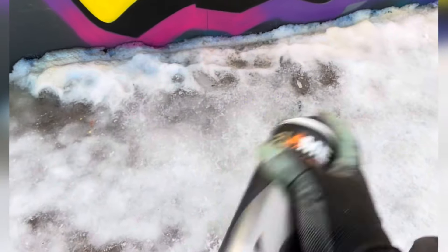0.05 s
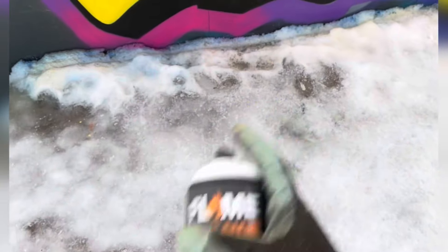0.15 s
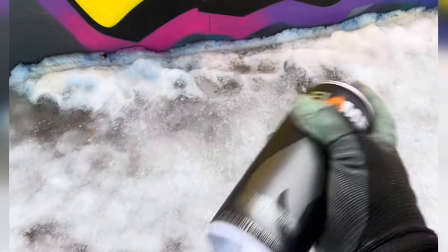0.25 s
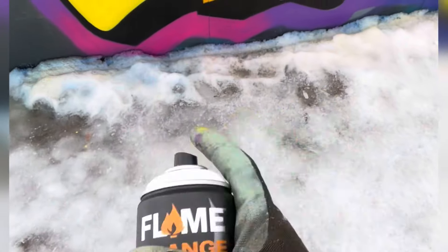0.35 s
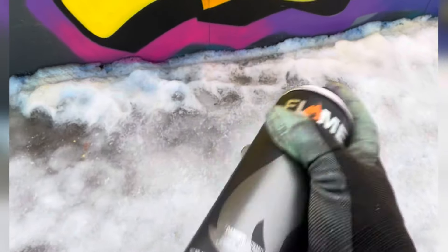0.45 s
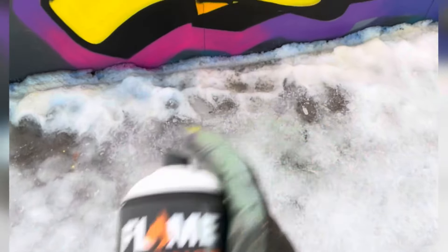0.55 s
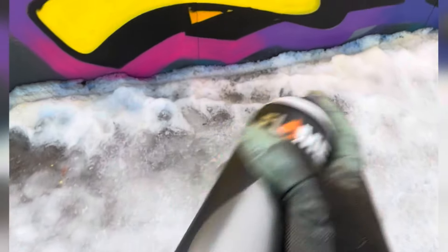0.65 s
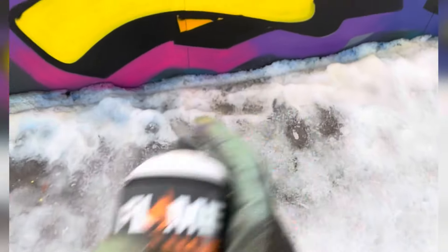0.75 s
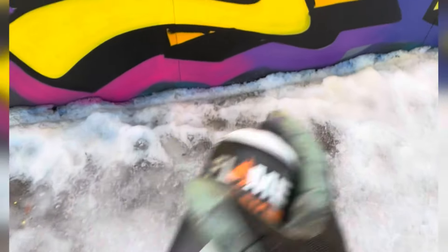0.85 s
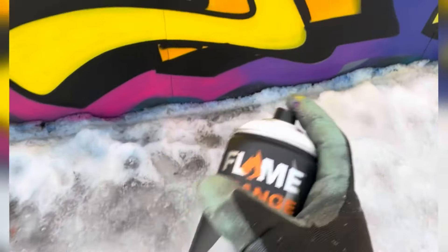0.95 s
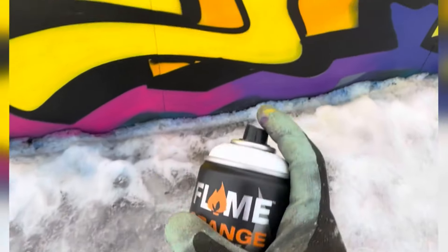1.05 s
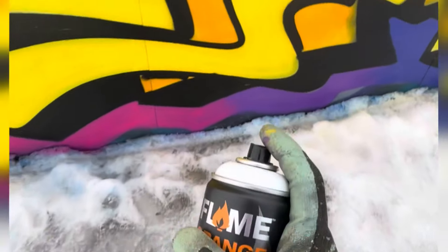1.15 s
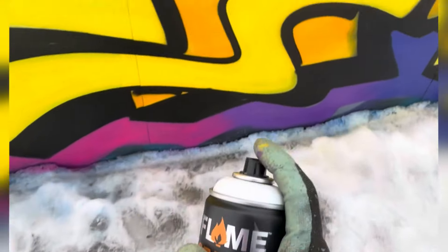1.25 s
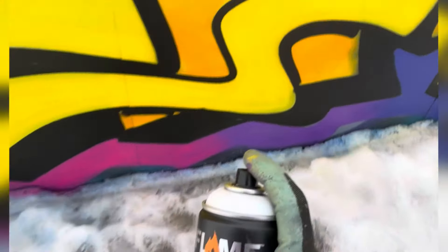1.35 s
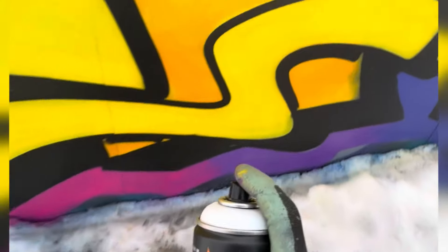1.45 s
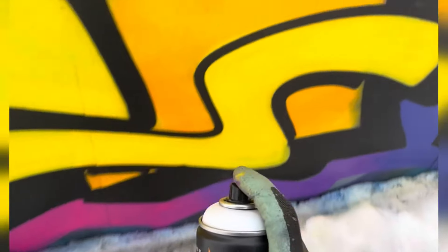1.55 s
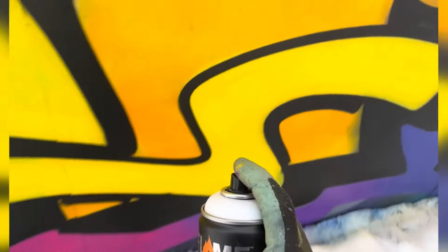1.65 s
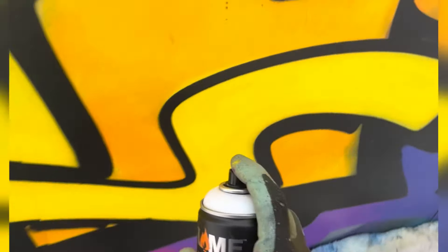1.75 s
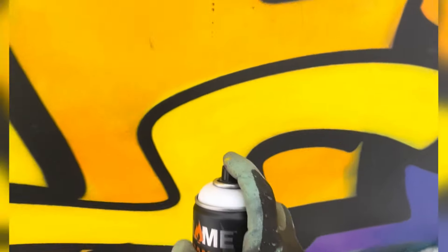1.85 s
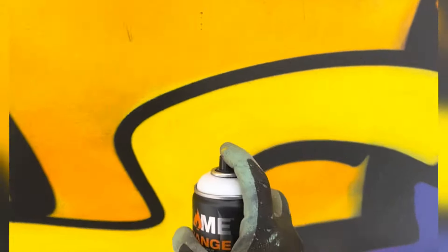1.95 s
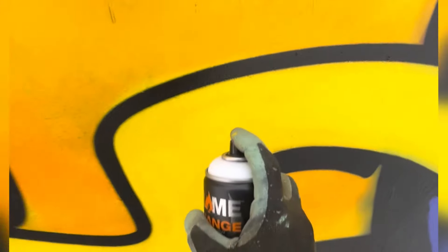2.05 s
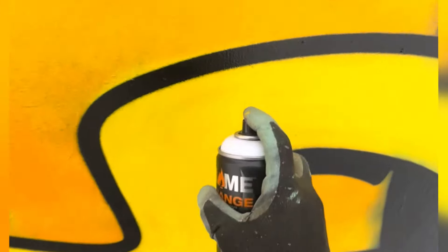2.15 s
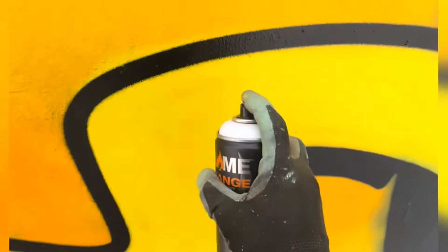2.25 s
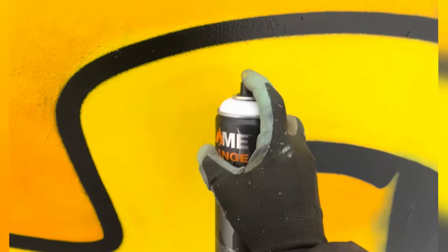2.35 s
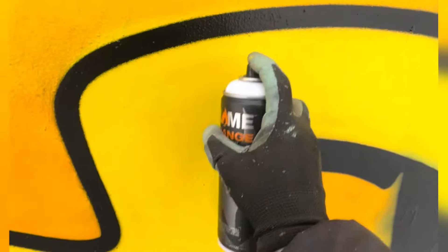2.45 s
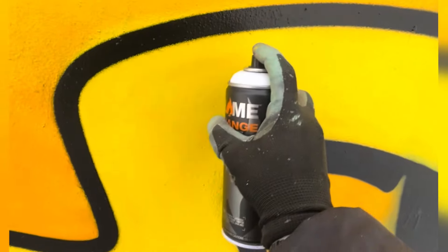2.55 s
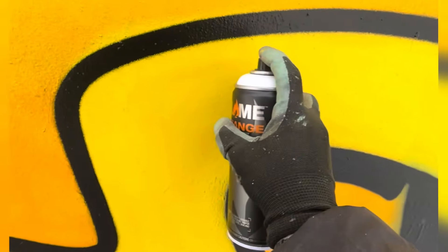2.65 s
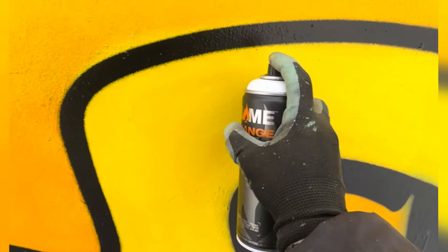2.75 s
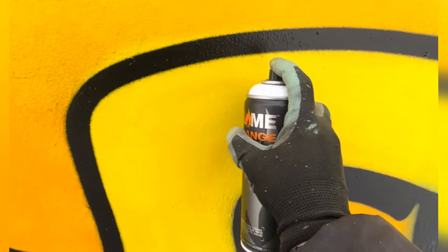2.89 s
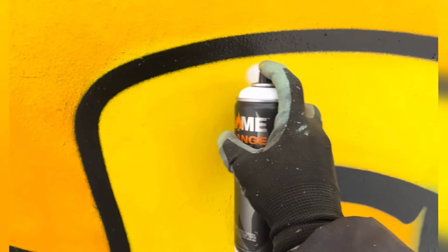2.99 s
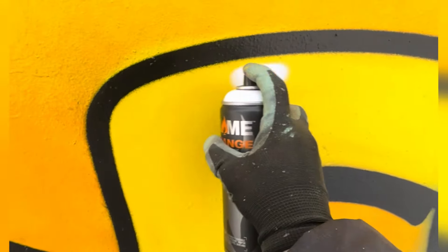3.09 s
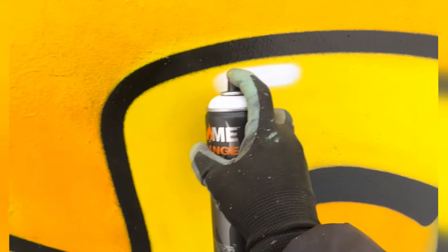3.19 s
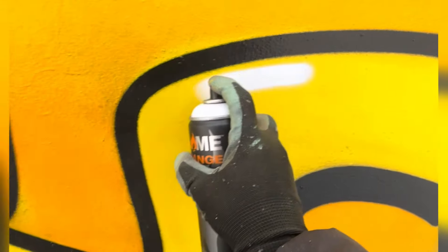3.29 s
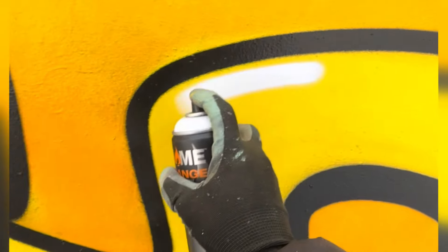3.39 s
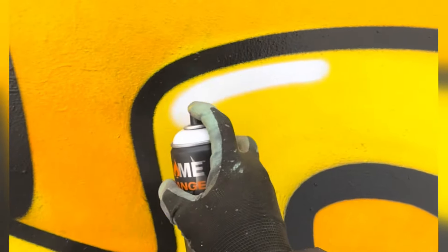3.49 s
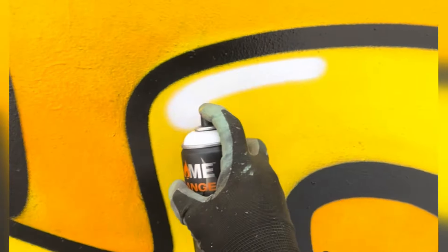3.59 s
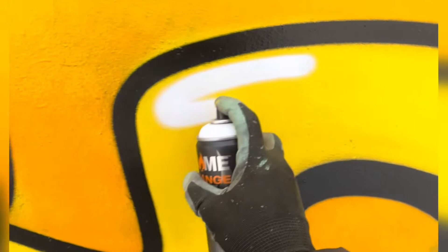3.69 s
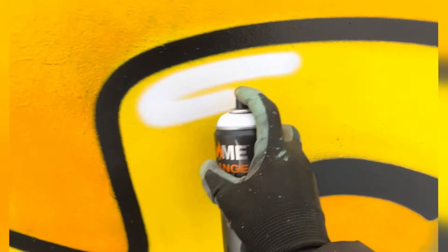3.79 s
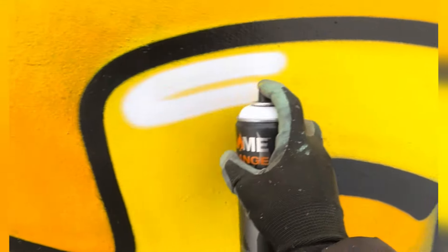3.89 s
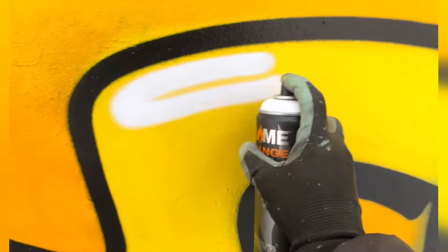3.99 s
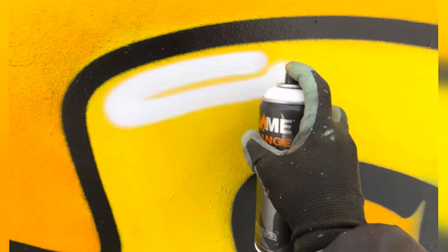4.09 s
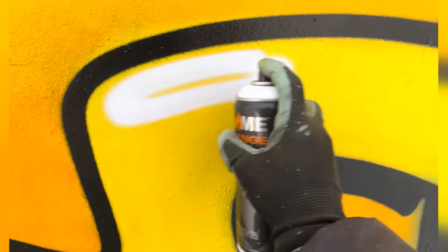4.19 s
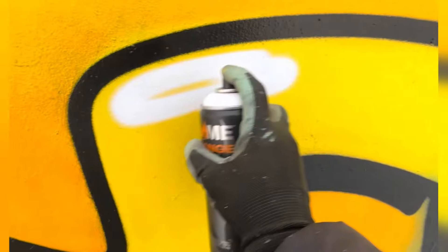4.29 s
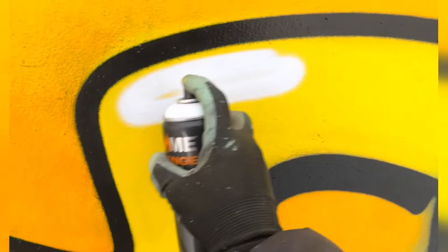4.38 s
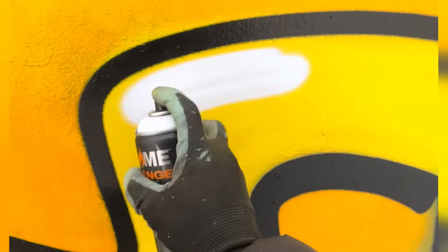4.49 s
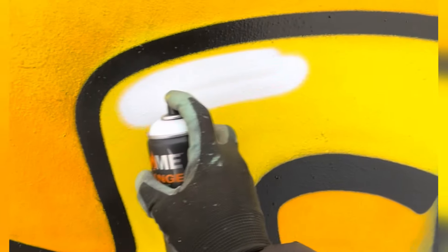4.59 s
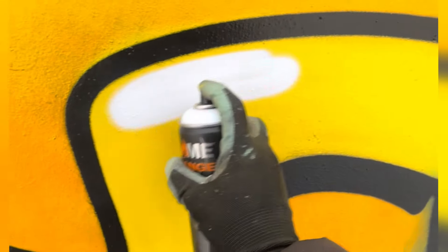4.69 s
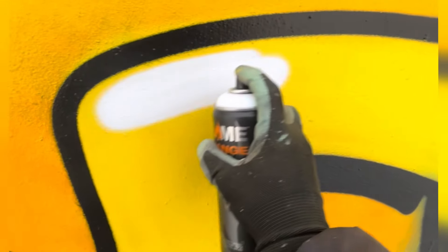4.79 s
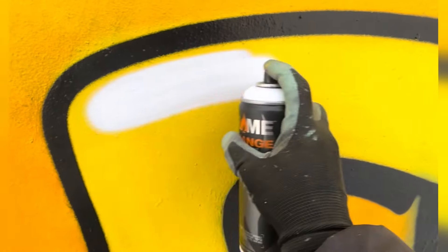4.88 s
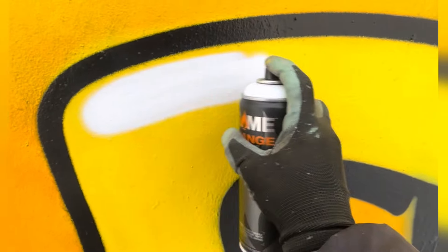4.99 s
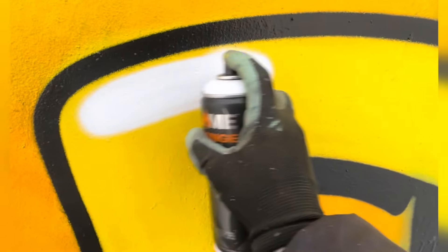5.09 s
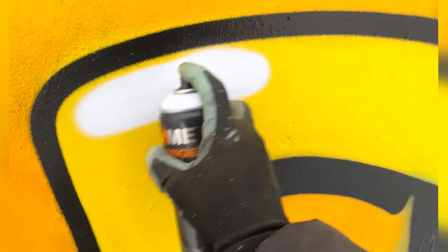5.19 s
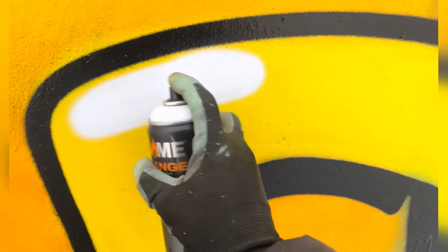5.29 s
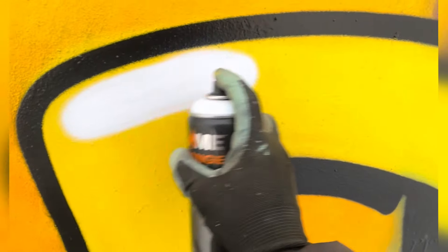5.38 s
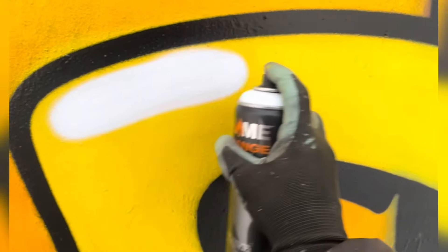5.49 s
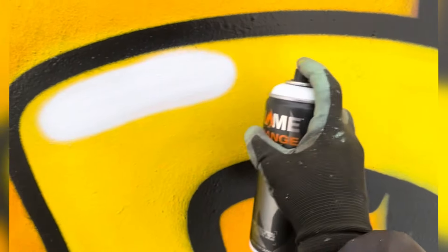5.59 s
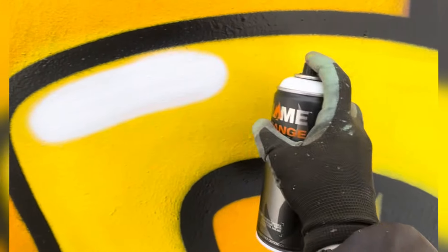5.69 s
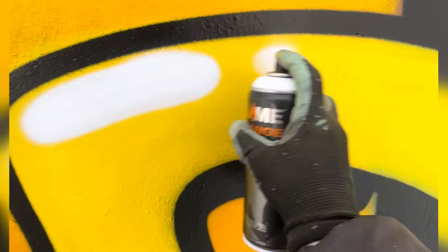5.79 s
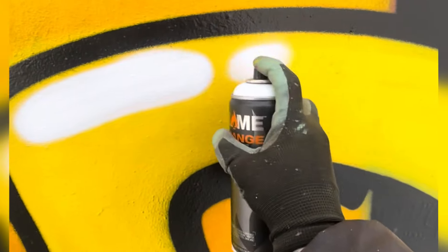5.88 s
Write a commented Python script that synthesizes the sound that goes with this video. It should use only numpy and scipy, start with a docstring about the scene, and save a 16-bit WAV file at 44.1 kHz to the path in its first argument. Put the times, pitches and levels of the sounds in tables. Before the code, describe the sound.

Outdoors beside a wall, recorded close in stereo. From 0 to about 0.95 s a steel paint can is shaken vigorously: its ball clacks in a dense uneven rattle, short damped thuds around 1.5 to 3 kHz with bright ticks, loudest between 0.2 and 0.9 s. A few weaker knocks straggle until 1.33 s. Wind thumps low, strongest near 0.1 s. From 1.25 to 2.6 s boots crunch in crusty snow, the glove scuffs the can, a sleeve slides softly around 1.55 s, and a distinct hollow pop lands at 1.87 s, followed by smaller ones. It nearly quiets, then at 2.9 s a smooth spray hiss opens quickly, its tone shifting from mid-treble to thinner and higher as the can turns, ending at 5.2 s. A second stroke starts at 5.69 s and continues almost to the end. Distant traffic murmurs throughout; a deep vehicle rumble grows after 3.7 s, with a faint intermittent whine near 1.4 kHz.

```python
"""A steel paint can is shaken outdoors by a gloved hand: its mixing ball rings the paint-damped wall.
Boots break crusty snow in uneven grains of noise, air pockets pop, and a sleeve slides with a smooth hiss.
The can sprays one long stroke and starts another: noise through resonances that shift as the can turns.
Wind buffets a two-port microphone in noise bands, over distant traffic and a faint wavering sine whine."""
import sys
import numpy as np
from scipy import signal
from scipy.fft import rfft, irfft
from scipy.io import wavfile
from scipy.ndimage import uniform_filter1d

SR = 44100
rng = np.random.default_rng(int(sys.argv[2]) if len(sys.argv) > 2 else 0)


def put_to_file(sound):
    """Save the sound as 16-bit audio at rate SR, in the file named by the first command-line argument."""
    columns = np.atleast_2d(sound).T  # one column per channel
    safe = np.clip(columns, -1, 1)
    whole_steps = np.round(safe * 32767)
    wavfile.write(sys.argv[1], SR, whole_steps.astype(np.int16))


def to_linear_factor(level_db):
    """Convert decibel levels (scalar or array-like) to linear amplitude factors."""
    exponent = np.asarray(level_db, float) / 20
    return 10 ** exponent


N = 261954
T = np.arange(N) / SR  # s
HZ = np.maximum(np.arange(N // 2 + 1) * SR / N, 1)
KNOCK_LEN, TAIL_LEN, GRAIN_LEN = 1024, 4096, 24  # samples

# ball against the can: t/s, thud level/dB, tick level/dB, thud f/Hz
KNOCKS = [(0.036, -14, -14.5, 3050), (0.06, -18.5, -53, 1660), (0.077, -24.5, -28, 1570),
          (0.1148, -13.5, -4, 3050), (0.1389, -17, -25.5, 2360), (0.1604, -14.5, -29, 1700),
          (.184, -35.5, -52, 1490), (0.2026, -4.5, -10.5, 2890), (0.2796, -15, -14, 1900),
          (0.302, -2.5, -1, 2560), (0.3634, -7, -14, 2200), (0.3986, -1.5, -1.5, 3390),
          (0.409, -4.5, -32, 2120), (0.447, -9.5, -9.5, 2740), (0.4567, -13, -16, 1600),
          (0.501, -15.5, -21, 1880), (0.509, -10, 6.5, 2960), (0.519, -9, -35, 2180),
          (0.547, -12.5, 1, 3040), (0.579, -13, -27, 1730), (0.6285, 1.5, 3, 2440), (0.6533, -8, 0, 2150),
          (0.6679, -13, -32.5, 1550), (0.6956, -15, -23, 1330), (0.721, -13, -21.5, 1860),
          (0.7302, -39.5, 3, 3100), (0.7379, -16, 6.5, 3040), (0.754, -14, -48.5, 2450),
          (0.795, -18, -17, 1620), (0.8307, -18, -41, 2230), (0.853, -4.5, -14.5, 3220),
          (0.865, -7, -28.5, 2170), (0.878, -16.5, -24, 1420), (0.907, -18.5, -43, 1550),
          (0.935, -8, -51, 1780), (.956, -25, -50, 1570), (0.9813, -22, -47, 1600), (1.038, -30, -50, 1900),
          (1.0732, -12, -14.5, 3040), (1.134, -18, -19.5, 1490), (1.187, -29, -32.5, 2370),
          (1.254, -19.5, -38, 2150), (1.2925, -20, -10.5, 2130), (1.33, -25, -16, 2520)]
# modes of the can wall: f/Hz, relative level/dB, t60/s
CAN_MODES = [(1340, 6.5, 0.007), (2450, -9.5, 0.013), (4334, 12, 0.0013), (5480, -7.5, 0.0034),
             (6410, 0.5, 0.0031), (8850, 1.5, 0.0018)]
# processing halo, a narrow 5 kHz ring before and after some knocks: t/s, relative level/dB
HALOS = [(.2, -18.5), (.295, -11.5), (.391, -4), (.505, -14.5), (.621, -5.5), (.725, -8.5), (.788, -26),
         (.846, -19.5), (1.066, -23)]
DOME_HZ = 2576

# boots in the crust and glove on the can: start t/s, length/s, level/dB
CRUNCHES = [(.545, 0.06, -44.5), (1.252, 0.087, -39.5), (1.36, .003, -43), (1.835, 0.15, -44.5),
            (2.078, 0.0035, -50), (2.175, 0.065, -54.5), (2.32, 0.01, -59), (2.47, 0.078, -53),
            (2.777, 0.00095, -59)]
CRUNCH_ATTACK_S, CRUNCH_RELEASE_S = 0.0044, 0.011
# spectrum of the crunch: f/Hz, level per Hz/dB
CRUNCH_SPECTRUM = [(500, 5.5), (1000, 0), (2500, 0), (4500, -4), (7000, -9), (10000, -19.5), (12000, -54)]
# faint rustle running under the steps: t/s, level/dB
FIDGET = [(0, -48.5), (1.2, -56), (2.05, -48.5), (2.55, -59), (2.67, -63.5), (2.72, -70.5), (2.8, -83)]
STIR_DB, STIR_DECAY_S = -40, 0.012  # rustle after each knock, level against its thud
# glove scuffs on the can, rough and hollow: start t/s, length/s, level/dB, f/Hz
SCUFFS = [(0.035, 0.0082, -31, 1060), (0.555, 0.041, -28, 1040), (1.309, 0.023, -32.5, 1030),
          (1.422, 0.029, -42, 1930), (1.456, .37, -54.5, 2570), (1.863, 0.0088, -31, 2700),
          (1.889, 0.009, -30.5, 2500), (1.914, 0.041, -35.5, 2560), (2.198, 0.071, -45.5, 1020),
          (2.488, 0.035, -45, 1108), (2.512, 0.011, -39, 3620)]
# dull hollow pops and bumps under boot and glove: t/s, peak level/dB, f/Hz
POPS = [(1.263, -32, 320), (1.32, -25.5, 775), (1.8686, -11, 683), (1.999, -28.5, 780), (2.06, -33.5, 910),
        (2.176, -36, 990), (2.258, -32.5, 990), (2.336, -36.5, 1100), (2.607, -30, 254)]
# smooth slide of the sleeve: t/s, level/dB
SLEEVE = [(1.2, -79), (1.4, -61.5), (1.55, -51), (1.75, -63.5), (2.3, -64.5)]
# spectrum of the cloth: f/Hz, level per Hz/dB
CLOTH_SPECTRUM = [(800, -11), (6500, -27.5), (8400, 6), (9500, -4), (11000, -53.5)]

# valve held open: start t/s, length/s, level/dB
STROKES = [(2.897, 2.3, -45.5), (5.688, .3, -46.5)]
VALVE_OPEN_S, VALVE_SHUT_S = 0.023, 0.02
# spectrum of the bare jet: f/Hz, level per Hz/dB
JET_SPECTRUM = [(1500, -9.5), (3400, -11.5), (4200, -19), (7000, -10.5), (9000, 1.5)]
# nozzle resonances: f/Hz, width/Hz, level before the turn/dB
NOZZLE = [(2440, 200, -15), (5670, 970, -5.5), (6800, 1400, -4.5), (9530, 2060, -4.5), (4700, 1300, -13.5)]
# strength of the 6.8 kHz resonance as the can turns: t/s, level/dB
TURN = [(2.9, 5), (3.42, -6.5), (3.55, 3), (3.95, 1.5), (4.25, -7.5), (4.55, -12), (5.05, -11.5),
        (5.7, -17), (5.94, -12)]
TOP_DB, TOP_PER_TURN = -3, -0.78  # outer resonances gain what it loses: dB, dB per dB
# dips in the spray's hiss and its steep treble fall-off: f/Hz, level/dB
HISS_DIPS = [(4100, -2.5), (4450, -2), (4850, -4.5), (5150, 0.5), (7150, -1), (7400, -12), (7650, 0.5),
             (8700, -6), (9200, -15), (10000, -27)]
# patchy treble bands heard while the spray sounds: from f/Hz, to f/Hz, level/dB
PATCHY_BANDS = [(8970, 10200, -22), (11870, 13500, -19.5), (14800, 15800, -24)]

# gusts on the ports: t/s, level/dB, reach f/Hz
GUSTS = [(0, -33.5, 251), (.12, -19.5, 399), (.2, -26, 294), (.32, -32.5, 148), (.8, -40, 101),
         (1.08, -28.5, 125), (1.25, -43, 122), (1.8, -37, 128), (2.16, -35.5, 108), (2.4, -45.5, 111.7),
         (2.62, -33, 120), (2.95, -41.5, 64.7), (3.7, -48.5, 88)]
# spectrum of distant traffic: f/Hz, level per Hz/dB
TOWN_SPECTRUM = [(150, -4), (300, -4), (550, -4.5), (1000, -15), (1900, -25.5), (3500, -28.5),
                 (6500, -36.5), (8500, -32), (10000, -46)]
TOWN_DB = -52
# a heavy vehicle draws nearer: t/s, level/dB
RUMBLE = [(2.5, -80.5), (3.7, -49), (4.2, -38), (5.94, -38)]
RUMBLE_HZ, RUMBLE_WIDTH_HZ = 59.9, 80.6
# spells of the whine: start t/s, length/s, level/dB
WHINE = [(2.8, 0.31, -64.5), (3.28, 0.16, -62.5), (4.3, 0.1, -60.5), (4.65, 0.41, -63.5),
         (5.29, 0.18, -60.5), (5.57, 0.088, -59)]
WHINE_HZ, WHINE_FADE_S = 1423, 0.022

# right port against left for a source in front: f/Hz, lag/rad, level/dB
PORTS = [(3720, 0.37, 0.5), (4740, 1.75, 0), (6600, 0.23, -3), (8110, 5, 8.5), (9550, 1.9, 3.5),
         (14750, 2 * np.pi, -1.5)]
DUCK_DB, DUCK_S = -18.5, 0.19  # level above 1 kHz that halves the gain; memory of the gain control


def noise():
    """White noise, rms 1."""
    return rng.standard_normal(N)


def unit(x):
    """Scale to rms 1."""
    return x / np.sqrt(np.mean(x ** 2))


def over_hz(table, column=1):
    """Read a table column on a log-frequency axis."""
    table = np.array(table)
    return np.interp(np.log(HZ), np.log(table[:, 0]), table[:, column])


def colour(x, spectrum):
    """Give x a (f/Hz, level/dB) spectrum, steeply closed outside it."""
    edge = np.minimum(HZ / spectrum[0][0], 1) ** 2 * (HZ < spectrum[-1][0])
    return unit(irfft(rfft(x) * to_linear_factor(over_hz(spectrum)) * edge, N))


def cut(x, order, hz, kind):
    """Butterworth filter."""
    return signal.sosfilt(signal.butter(order, hz, kind, fs=SR, output="sos"), x)


def peak(x, hz, width):
    """One resonance, gain 1 at the centre."""
    return signal.lfilter(*signal.iirpeak(hz, hz / width, SR), x)


def resonant(x, hz, width):
    """The same resonance twice in a row, scaled to rms 1."""
    return unit(peak(peak(x, hz, width), hz, width))


def ring(hz, t60, phase, t):
    """A struck mode: a sine that falls 60 dB in t60."""
    return np.sin(2 * np.pi * hz * t + phase) * np.exp(-np.log(1000) * t / t60)


def curves(table):
    """Columns of a table, one value per sample."""
    s, *columns = np.transpose(table)
    return [np.interp(T, s, c) for c in columns]


def walk(rate):
    """Random levels held 1 / rate s and slewed twice; spread near 1."""
    k = int(SR / rate)
    held = np.repeat(rng.standard_normal(N // k + 1), k)
    return 2.0 * uniform_filter1d(uniform_filter1d(held, k), k)[:N]


def swells(table, attack_s, release_s):
    """Gain of sounds that rise, hold for their length and die away."""
    gain = 0
    for s, length, db in table:
        rise = 1 - np.exp(-np.maximum(T - s, 0) / attack_s)
        fall = np.exp(-np.maximum(T - s - length, 0) / release_s)
        gain = gain + to_linear_factor(db) * rise * fall
    return gain


def ports(x, diffuse):
    """A near source: the microphone body delays and shades the right port; a share arrives scattered."""
    shading = to_linear_factor(over_hz(PORTS, column=2)) * np.exp(-1j * over_hz(PORTS))
    right = irfft(rfft(x) * shading, N)
    return np.array([x + diffuse[0], right + diffuse[1]])


def wall_knock(hz, chance, chatter, paint):
    """One blow: a low thud at the place struck and a bright tick, both from short decaying wall modes."""
    t = T[:KNOCK_LEN]
    low_hz = hz * 0.557 * np.exp(0.11 * chance[-2, 1])
    thud = ring(hz, 0.0043, chance[-1, 0], t) + 0.19 * ring(low_hz, 0.01, chance[-2, 0], t)
    thud = thud + 0.83 * paint * np.exp(-t / 0.00093)  # paint slaps the wall
    tick = 0.48 * chatter * np.exp(-t / 0.00055)  # the ball chatters on the seam
    for (mode_hz, db, t60), (phase, detune, scatter) in zip(CAN_MODES, chance):
        tuned_hz = mode_hz * (1 + 0.00035 / t60 * detune)
        mode = to_linear_factor(db + 0.86 * scatter) * ring(tuned_hz, t60, 2 * phase, t)
        if mode_hz < 3800:
            # low modes join the thud most when close to its pitch
            thud = thud + mode * np.exp(-np.log(mode_hz / hz) ** 2 / 0.035)
        else:
            tick = tick + mode
    return thud, tick


def knocks():
    """The run of blows with the top damped by paint, and the impulses that ring the domed base."""
    out, blows, t = np.zeros(N + KNOCK_LEN), np.zeros(N), T[:KNOCK_LEN]
    chances = rng.standard_normal((len(KNOCKS), len(CAN_MODES) + 2, 3))
    used = len(KNOCKS) * KNOCK_LEN
    chatters = resonant(noise(), 5000, 4800)[:used].reshape(-1, KNOCK_LEN)
    slaps = resonant(noise(), 2100, 3200)[:used].reshape(-1, KNOCK_LEN)
    rise = (1 - np.exp(-t / 0.0009)) ** 2  # the contact builds over a millisecond
    for (s, thud_db, tick_db, hz), chance, chatter, paint in zip(KNOCKS, chances, chatters, slaps):
        thud, tick = wall_knock(hz, chance, chatter, paint)
        # blows near the domed base ring it
        blows[int(s * SR)] = to_linear_factor(thud_db) * np.exp(-(np.log(hz / DOME_HZ) / 0.07) ** 2)
        i = int((s - .0009) * SR)
        for part, db in ((thud, thud_db), (tick, tick_db)):
            out[i:i + KNOCK_LEN] += to_linear_factor(db) * rise * part / np.abs(rise * part).max()
    return cut(out[:N], 2, 9500, "low"), blows


def scattered_tails(x):
    """Snow and wall scatter a short tail; the moving hand scatters the treble differently to each port."""
    decay = np.exp(-np.log(1000) * T[:TAIL_LEN] / 0.065)
    bright = peak(x, 12000, 4500)
    tails = []
    for _ in range(2):
        tail = to_linear_factor(-36.5) * signal.fftconvolve(x, noise()[:TAIL_LEN] * decay)[:N]
        glint = to_linear_factor(-26.5) * signal.fftconvolve(bright, noise()[:GRAIN_LEN * 2])[:N]
        tails.append(tail + glint)
    return tails


def ball():
    """The mixing ball rings wall and base; processing adds thin, quiet copies before and after each knock."""
    struck, blows = knocks()
    # a thinner, quieter copy follows each knock by 7.5 ms
    after = to_linear_factor(-19) * np.roll(peak(struck, 4500, 5000), int(.0075 * SR))
    tails = scattered_tails(struck)
    can = struck + to_linear_factor(32.5) * peak(blows, DOME_HZ, 110)
    # the recorder's processing puts a faint early copy ahead of each knock
    ahead = np.roll(to_linear_factor(-22.5) * peak(can, 3500, 2500), -int(0.0083 * SR))
    return ports(can + after + ahead, tails)


def processing_halo():
    """A narrow 5 kHz filter run both ways in time rings before and after some knocks, mostly on the right."""
    impulses = np.zeros(N)
    for s, db in HALOS:
        impulses[int(s * SR)] = to_linear_factor(db)
    both_ways = signal.filtfilt(*signal.iirpeak(4990, 30, SR), impulses)
    halo = to_linear_factor(22 + 2 * walk(150)) * both_ways
    halo = halo + to_linear_factor(27.5) * peak(impulses, 4990, 23)  # a fainter, longer tail
    return np.array([[.5], [1.8]]) * halo


def rustle():
    """Gain of the crunch: steps, a stir after every knock and a faint fidget."""
    stirs = [(s, 0, db + STIR_DB) for s, db, _, _ in KNOCKS]
    stir = swells(stirs, STIR_DECAY_S / 10, STIR_DECAY_S)
    return swells(CRUNCHES, CRUNCH_ATTACK_S, CRUNCH_RELEASE_S) + stir + to_linear_factor(curves(FIDGET)[0])


def crunch(grain):
    """Snow crust breaks in dense uneven grains; larger plates creak in patches at their own pitch."""
    gain = rustle()
    near, left, right = (gain * colour(grain * noise(), CRUNCH_SPECTRUM) for _ in range(3))
    creak = sum(to_linear_factor(-11 + 3 * walk(40.27)) * peak(near, hz, 0.21 * hz) for hz in (1050, 2500))
    left, right = cut([left, right], 2, 3200, "high")  # only the treble scatters
    return near + creak, left, right


def scuffs(grain):
    """The glove scrapes the can: grainy noise through one broad resonance a scuff."""
    rub, out = grain * noise(), 0
    for *scuff, hz in SCUFFS:
        out = out + swells([scuff], CRUNCH_ATTACK_S, 0.0051) * resonant(rub, hz, .85 * hz)
    return out


def sleeve():
    """Sliding cloth hisses smoothly: three independent noises under one wandering level."""
    sliding = to_linear_factor(curves(SLEEVE)[0] + 0.99 * walk(25.5)) * (T < SLEEVE[-1][0])
    return [sliding * colour(noise(), CLOTH_SPECTRUM) for _ in range(3)]


def pops():
    """Every air pocket swells for two cycles and dies within about ten."""
    out, t = np.zeros(N), T[:TAIL_LEN]
    for s, db, hz in POPS:
        pop = (1 - np.exp(-t * hz / 1.2)) ** 2 * ring(hz, 8.5 / hz, 0, t)
        out[int(s * SR):][:TAIL_LEN] += to_linear_factor(db) * pop / np.abs(pop).max()
    return out


def steps():
    """Crust, glove, cloth and air pockets near the microphone; the grains have random sizes."""
    sizes = np.minimum(rng.exponential(size=N // GRAIN_LEN + 1), 5.5).repeat(GRAIN_LEN)[:N]
    grain = to_linear_factor(2.2 * sizes + .9 * walk(160))
    crust, crust_left, crust_right = crunch(grain)
    slide, slide_left, slide_right = sleeve()
    left = 1.47 * crust_left + 1.8 * slide_left
    right = 1.4 * crust_right + 0.41 * slide_right
    return ports(crust + scuffs(grain) + slide + pops(), [left, right])


def jet():
    """Turbulence through the nozzle's resonances; most of them shift in strength as the can turns."""
    mid_db = curves(TURN)[0]
    top_db = TOP_DB + TOP_PER_TURN * mid_db
    turns_db = (0.16 * top_db, 0, mid_db, top_db, top_db)  # in the order of NOZZLE
    out = to_linear_factor(-6) * colour(noise() * to_linear_factor(0.55 * walk(90)), JET_SPECTRUM)  # droplets sputter
    for (hz, width, db), turn_db in zip(NOZZLE, turns_db):
        flicker_db = 1.2 * walk(12)
        out = out + to_linear_factor(db + turn_db + flicker_db) * resonant(noise(), hz, width)
    return irfft(rfft(out) * to_linear_factor(over_hz(HISS_DIPS)), N)


def patchy_treble():
    """Narrow treble noise bands whose levels wander separately."""
    out = 0
    for low_hz, high_hz, db in PATCHY_BANDS:
        band = cut(noise(), 8, [low_hz, high_hz], "band")
        out = out + to_linear_factor(db + 2.6 * walk(4.23)) * unit(band)
    return out


def spray():
    """The valve gates the jet; the wall scatters its treble, and patchy treble bands sound along with it."""
    valve = swells(STROKES, VALVE_OPEN_S, VALVE_SHUT_S)
    patches = patchy_treble()
    near, left, right = (valve * jet() for _ in range(3))
    scattered = 1.52 * cut([left, right], 2, [3800, 11500], "band")
    return ports(near + valve * patches, scattered)


def wind():
    """Eddies press on the ports in bursts: noise bands pushing one port and, in part, pulling the other."""
    db, reach_hz = curves(GUSTS)
    # f/Hz, width/Hz, likeness of the ports (-1 is opposite)
    bands = [(50.7, 33, -0.69), (83.0, 107, -0.32), (146.0, 130, -0.6), (243, 363, -0.59),
             (407, 710, -0.99)]
    out, burst_db = 0, 1.3 * walk(21)
    for hz, width, alike in bands:
        left, other = (resonant(noise(), hz, width) * to_linear_factor(burst_db + 2.17 * walk(17)) for _ in range(2))
        right = alike * left + np.sqrt(max(1 - alike ** 2, 0)) * other
        ratio = hz / np.maximum(reach_hz, 30)
        fall = ratio / (0.23 + ratio) / (1 + ratio ** 2)  # strongest just under the reach
        out = out + fall * np.array([left, to_linear_factor(-3.0) * right])
    return to_linear_factor(db) * out


def rumble():
    """A heavy vehicle draws nearer: low resonant noise, alike at both ports."""
    low = resonant(noise(), RUMBLE_HZ, RUMBLE_WIDTH_HZ)
    return low * to_linear_factor(curves(RUMBLE)[0] + 1.0 * walk(11.0))


def whine():
    """A thin sine of wavering pitch and level that comes and goes."""
    hz = WHINE_HZ + 2.7 * walk(3.1)
    gain = swells(WHINE, WHINE_FADE_S, WHINE_FADE_S) * to_linear_factor(1.3 * walk(16))
    return gain * np.sin(2 * np.pi * np.cumsum(hz) / SR)


def town():
    """Distant traffic as slowly wandering noise, partly shared by the ports, with rumble and whine."""
    mid, left, right = (colour(noise(), TOWN_SPECTRUM) * to_linear_factor(.8 * walk(3.5)) for _ in range(3))
    traffic = to_linear_factor(TOWN_DB) * np.array([mid + 1.19 * left, mid + 0.74 * right])
    return traffic + whine() + rumble()


def scene():
    """Everything at the two ports, with the halo around the knocks."""
    return ball() + processing_halo() + steps() + spray() + wind() + town()


def duck(x):
    """Gain control: loud treble pulls the level down for a moment."""
    treble = cut(x.mean(axis=0), 2, 1000, "high")
    keep = np.exp(-1 / (DUCK_S * SR))
    level = np.sqrt(signal.lfilter([1 - keep], [1, -keep], treble ** 2))
    return x / (1 + level / to_linear_factor(DUCK_DB))


def band_limit(x):
    """A steep low-pass at the top of the band."""
    return signal.sosfilt(signal.butter(12, 17130, fs=SR, output="sos"), x)


def record(dry):
    """The microphone drops the deepest bass, ducks after loud knocks and rounds the loudest peaks."""
    dry = cut(dry, 3, 42, "high")
    return band_limit(np.tanh(duck(dry)))


dry = scene()
out = record(dry)
put_to_file(out)
```